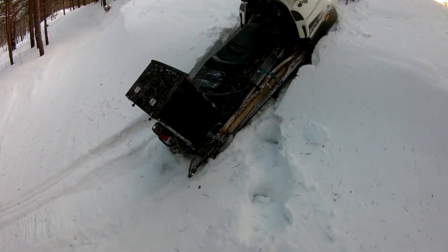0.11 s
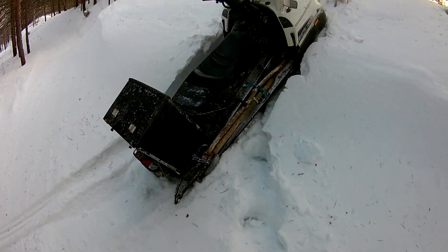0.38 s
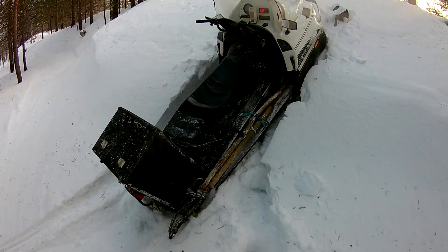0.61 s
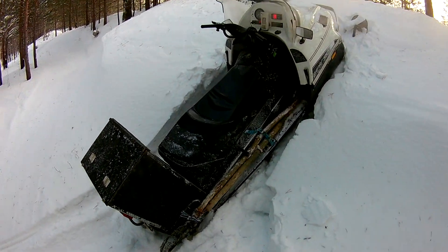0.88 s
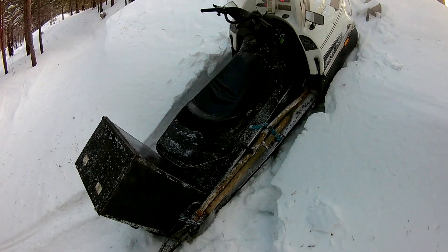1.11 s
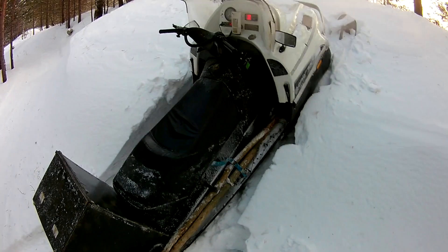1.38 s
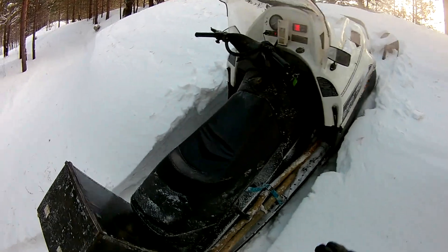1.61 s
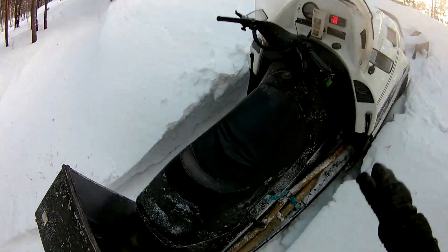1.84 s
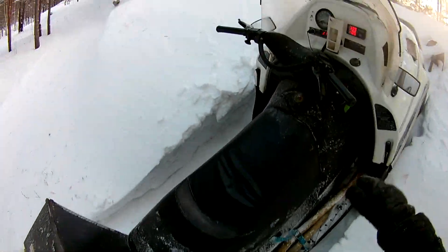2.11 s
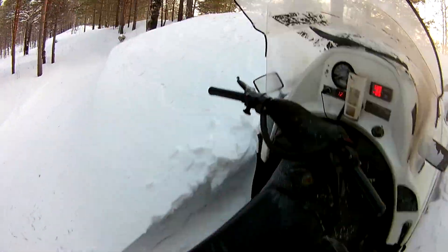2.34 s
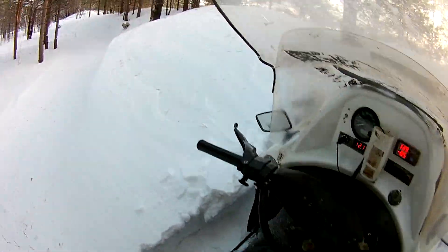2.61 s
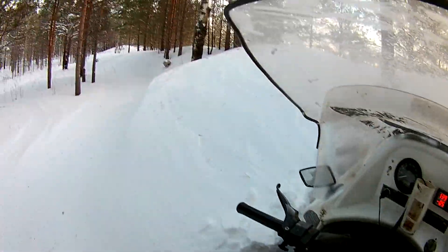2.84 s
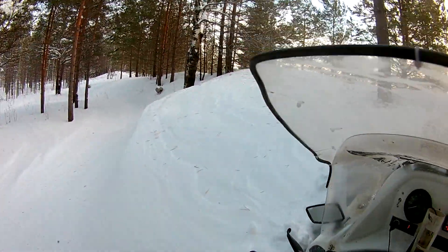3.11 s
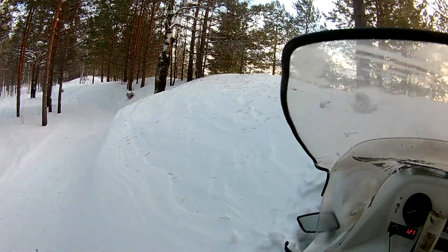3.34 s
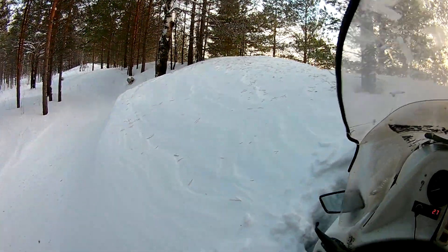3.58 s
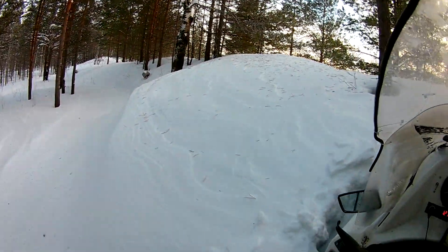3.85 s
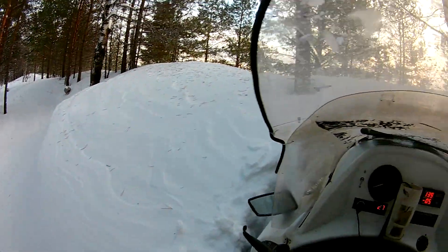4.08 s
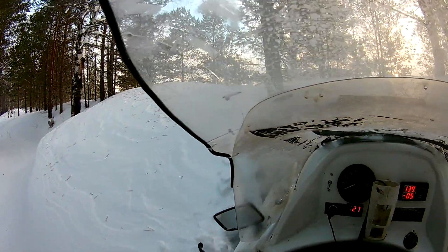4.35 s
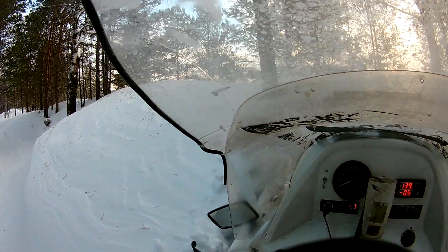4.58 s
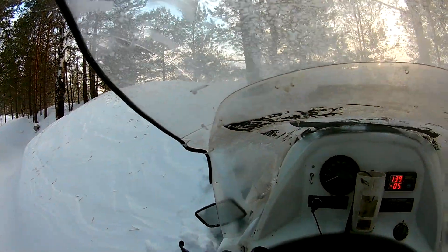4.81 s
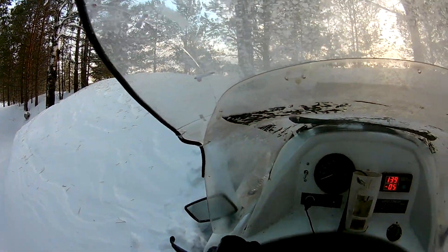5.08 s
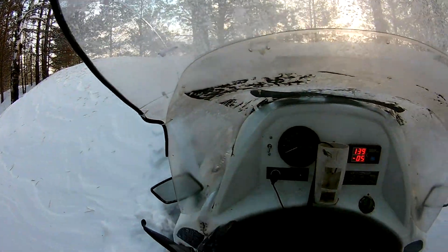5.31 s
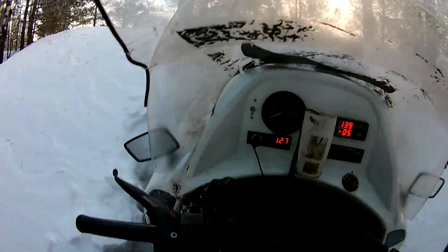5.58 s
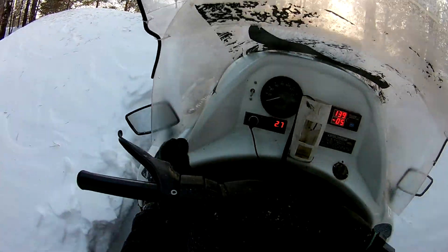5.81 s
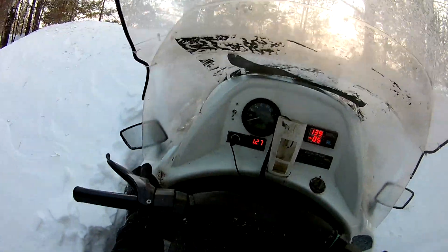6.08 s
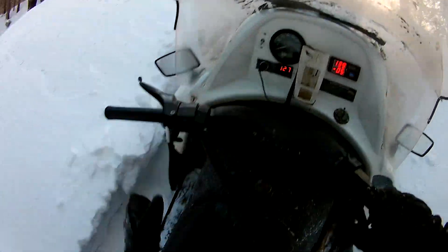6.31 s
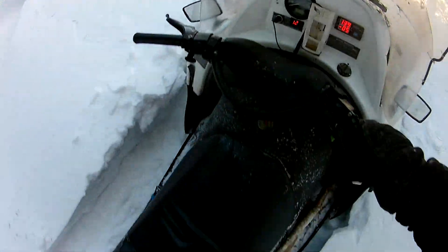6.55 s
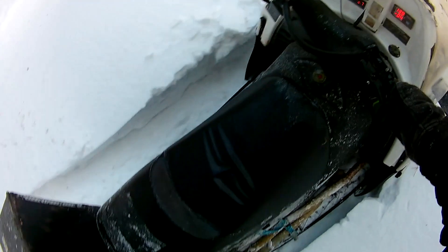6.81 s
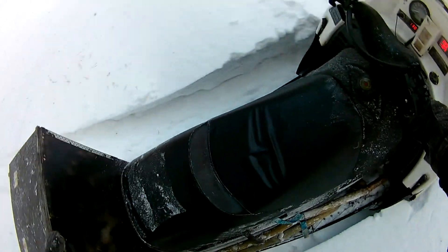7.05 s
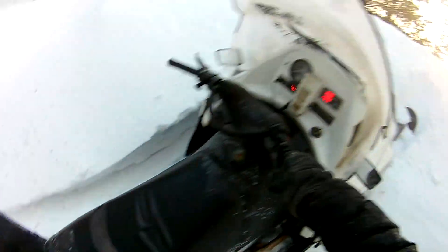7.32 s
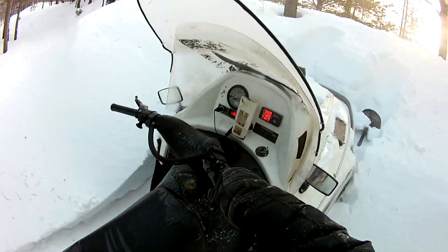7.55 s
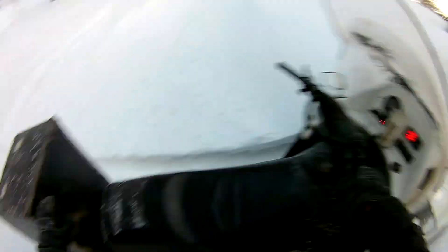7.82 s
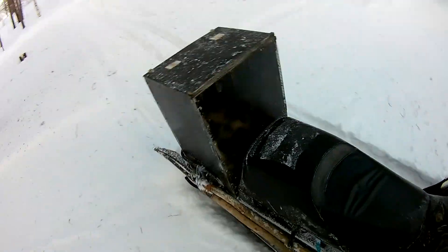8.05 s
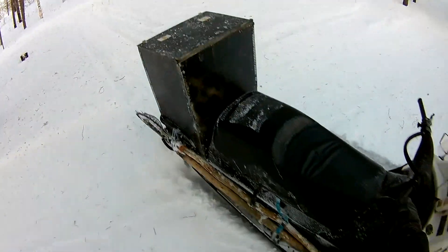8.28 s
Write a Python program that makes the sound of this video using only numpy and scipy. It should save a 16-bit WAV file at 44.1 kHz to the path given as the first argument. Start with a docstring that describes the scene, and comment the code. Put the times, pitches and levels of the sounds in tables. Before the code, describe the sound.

A single-cylinder four-stroke snowmobile idles in deep snow, outdoors and echo-free, heard from a microphone on the approaching rider. From 0 to 3.6 s its soft low putting, about ten and a half beats a second and slightly hunting, steadily grows nearer, gaining valve clatter and cowl rattle; a faint snowy crunch passes around 1 s, and a panel rings briefly at 2.5-3.2 s. Aboard, a lever double-clicks at 3.65 s, with dull clunks at 4.7, 5.2, 5.5 and 5.95 s. From 4.9 to 6.0 s a rough, wavering electric whine rises slightly and stops. At 6.3-6.5 s quick metallic clunks and hissy spits accompany a stumble; another clunk falls at 6.74 s. The engine surges to roughly twice idle speed by 7.1 s, pounding in a hard, blurred fast beat until 8.1 s. Loose steel ticks near 7.9-8.2 s, then the throttle shuts and the exhaust becomes duller, quieter and slower until the end at 8.4 s.

```python
"""In deep snow a single-cylinder four-stroke snowmobile idles; the listener walks up and climbs aboard.
Damped rings make the exhaust and the block; shaped noise timed by the crank makes the rattling parts.
A lever clicks and gears clunk as scrapes of noise, and a small electric motor whines as a wavering tone.
Then the throttle opens, the clutch bites, and the engine holds a fast beat and falls back."""
import sys
import numpy as np
from scipy import signal
from scipy.fft import rfft, irfft, next_fast_len
from scipy.io import wavfile
from scipy.ndimage import map_coordinates

SR = 44100
rng = np.random.default_rng(int(sys.argv[2]) if len(sys.argv) > 2 else 0)


def voltage_ratio(level):
    """Linear amplitude factor for a level in decibels (scalar or array-like)."""
    return 10 ** (np.asarray(level, float) / 20)


def generate_wav(sig):
    """Save sig (samples, or channels by samples) to the path in sys.argv[1] as 16-bit PCM at SR."""
    pcm = np.round(np.clip(np.atleast_2d(sig).T, -1, 1) * 32767).astype(np.int16)
    wavfile.write(sys.argv[1], SR, pcm)


N = 371322  # samples, 8.42 s

# Engine speed; the idle hunts, the pick-up stumbles: (time [s], four-stroke cycles per second [Hz])
CYCLE_RATE = [(0, 10.467), (.5, 10.658), (1.5, 10.502), (1.9, 10.833), (2.1, 10.555), (2.6, 10.536),
              (3, 10.793), (3.6, 10.715), (4.1, 10.059), (4.9, 10.129), (5.4, 10.949), (5.9, 11.315),
              (6.23, 10.853), (6.32, 9.817), (6.35, 12.723), (6.5, 14.076), (6.53, 18.533), (6.68, 13.489),
              (6.8, 18.947), (7.13, 22.914), (7.22, 21.616), (8.09, 22.495), (8.24, 19.556), (8.42, 18.598)]
# Exhaust character: (time [s], driven [0 = idle putt, 1 = driven thump], firing [0-1])
CHARACTER = [(0, 0.27, 1), (6.299, 0.21, 1), (6.449, 0.8, 0.8), (6.75, 0.4, 0.7), (6.95, 0.84, 0.89),
             (8.11, 0.92, 1), (8.135, 0.89, .08), (8.42, 1, 0.06)]
# The listener walks up: (time [s], nearness [dB, 0 = aboard], level of the tunnel's hum [dB])
NEARNESS = [(0, -12, -48), (.8, -9, -44.5), (1.7, -6, -44.5), (2.4, -3.5, -51.5), (2.8, -2, -50),
            (3.6, 0, -51), (4.0, -1, -49.5), (4.4, 1, -47.5), (5.2, 1, -35), (5.6, 0.5, -40.5),
            (6.0, -0.5, -30), (6.2, -0.5, -46)]
# How hard the machine is shaken once the drive takes up: (time [s], strain over idle [dB])
DRIVE_STRAIN = [(6.28, 0), (6.39, 6.5), (6.46, 6), (6.54, 3), (6.66, 4.5), (6.78, 9), (6.91, 11), (7.05, 8),
                (7.2, 5.5), (7.45, 6), (7.9, 5.5), (8.12, 4.5), (8.2, 2), (8.42, 0)]


def unit(x):
    """Normalisation: x scaled to an rms of 1."""
    return x / np.sqrt(np.mean(x ** 2) + 1e-20)


def curves(rows):
    """Linear interpolation: one value per sample for each column after the time."""
    s, *columns = np.transpose(rows)
    return [np.interp(np.arange(N) / SR, s, column) for column in columns]


def wobble(rate):
    """Band-limited fluctuation: a smooth random curve through rate knots a second."""
    knots = rng.standard_normal(int(N * rate / SR) + 4)
    return map_coordinates(knots, [np.arange(N) * rate / SR])


def filtered(x, response):
    """Linear filtering: the spectrum of x times a complex response of frequency."""
    m = next_fast_len(len(x) + SR // 4)
    return irfft(rfft(x, m) * response(np.fft.rfftfreq(m, 1 / SR)), m)[:len(x)]


def resonant(x, modes):
    """Modal superposition: x through parallel resonances (centre [Hz], width [Hz], level [dB])."""
    def response(f):
        total = 0
        for k, (centre, width, db) in enumerate(modes):
            mode = 1j * f * width / (centre * centre - f * f + 1j * f * width)
            total = total + (-1) ** k * voltage_ratio(db) * mode  # successive modes alternate in sign
        return total
    return filtered(x, response)


def coloured(x, points):
    """Spectral shaping: x through a gain curve of (frequency [Hz], gain [dB])."""
    hz, db = np.transpose(points)
    return filtered(x, lambda f: voltage_ratio(np.interp(np.log(f + 1), np.log(hz), db)))


def muffled(x, hz):
    """Absorption by snow and bodywork: four low-pass poles at hz, eased by one zero at 700 Hz."""
    return filtered(x, lambda f: 1 / (1 + 1j * f / hz) ** 4 * (1 + 1j * f / 700))


def struck(times, sizes, hz, t60, rise):
    """Impulse response of a damped oscillator, started at each time [s] with its own size."""
    t = np.arange(SR // 5) / SR
    kicks = np.zeros(N + SR)
    at = np.clip(np.round(times * SR).astype(int), 0, N + 1)
    np.add.at(kicks, at, sizes * (times > 0))
    ring = np.sin(2 * np.pi * hz * t) * voltage_ratio(-60 * t / t60) * (1 - np.exp(-t / rise))
    return signal.fftconvolve(kicks[:N], ring)[:N]


def crank():
    """Phase as the integral of rate: four-stroke cycles done at each sample."""
    start_cycle = 0.58
    return start_cycle + np.cumsum(curves(CYCLE_RATE)[0]) / SR


def stroke_times(share):
    """Inverted crank phase: moments at a share of each cycle (negative if before the start)."""
    done = crank()
    targets = np.arange(int(done[-1]) + 1) + share
    return np.interp(targets, done, np.arange(N) / SR, left=-1, right=N / SR + 1)


def part_levels():
    """Radiated level [dB] of each part as a linear sum of nearness, strain and driven terms."""
    # Each part by name: (base level [dB], dB per dB of nearness, dB per dB of strain, fully driven adds [dB]);
    # the tunnel's base comes on top of its hum, and some treble parts take a further trim in moving_parts
    parts = dict(tunnel=(0.5, 0.5, 1.72, 11), cowl=(-32, 0.96, 0.97, 0.5), block=(-36, 0.99, 0.81, 2.5),
             valves=(-50.5, 0.87, 1.24, -2), chain=(-64.5, 1.25, 1.26, -0.5), air=(-79, 0.3, 1.4, 8),
             shudder=(-37.5, 0.64, 1.35, 5.5))
    near, hum_db = curves(NEARNESS)
    strain, driven = curves(DRIVE_STRAIN)[0], curves(CHARACTER)[0]
    levels = {}
    for name, (base, per_near, per_strain, per_driven) in parts.items():
        levels[name] = base + per_near * near + per_strain * strain + per_driven * driven
    levels["tunnel"] = levels["tunnel"] + hum_db
    return levels


def exhaust():
    """Pulsed excitation of resonators: strokes ring the muffler at idle and push hard waves when driven."""
    # Exhaust gain: (time [s], level [dB])
    exhaust_level = [(0, -23), (.8, -21), (1.3, -19), (2.0, -17), (2.3, -15.5), (4.0, -16), (5.2, -13.5),
                     (6.2, -12.5), (6.39, -11), (6.46, -5), (6.53, -13), (6.59, -8.5), (6.65, -14),
                     (6.72, -8), (6.84, -5.5), (6.9, -11.5), (6.96, -5.5), (7.2, -5), (7.7, -6.5),
                     (7.9, -6), (8.12, -11), (8.25, -17), (8.42, -16)]
    # Muffler chambers answering one stroke at idle:
    # (delay after the firing mark [ms], pitch [Hz], relative pressure, t60 [s], rise [s])
    putt = [(-10.2, 125, -.6, .025, .001), (-6.6, 110, 1, .045, .001), (-4.6, 116, .55, .12, .001),
            (-3.3, 243, 1.4, .12, .0015), (-2, 408, .24, .08, .003)]
    # When driven, three hard pressure waves per stroke, unevenly spaced: columns as for putt
    thump = [(-9, 130, -1.6, .025, .004), (-4.9, 155, 6, .022, .006), (4.3, 210, 7.2, .021, .006)]
    # Gulp of air: (share of the cycle, gain per unit of 2.5 - driven [dB], gain per unit of driven [dB])
    intake = (.34, -2, -17)
    # Airbox resonances: (pitch [Hz], level [dB], t60 [s])
    airbox = [(123.4, 5, 0.066), (259, -21.5, 0.012)]
    shade_until_s, shade_db = 2.3, -6.5  # the bodywork first hides the muffler's ring at 243 Hz

    gulp_share, idle_db, driven_db = intake
    fire, gulp = stroke_times(0), stroke_times(gulp_share)
    s, driven, firing = np.transpose(CHARACTER)
    driven, firing = np.interp(fire, s, driven), np.interp(fire, s, firing)
    scatter_db = rng.standard_normal((len(fire), len(putt + thump) + 1))

    out = np.zeros(N)
    for k, (ms, hz, pressure, t60, rise) in enumerate(putt + thump):
        if k < len(putt):
            weight = 1 - driven
        else:
            weight = driven * (firing if ms < 0 else 1)  # a shut throttle leaves mainly the late wave
        if hz == 243:
            weight = weight * voltage_ratio(shade_db * (fire < shade_until_s))
        out += struck(fire + ms / 1000, weight * pressure * voltage_ratio(scatter_db[:, k]), hz, t60, rise)
    # unfired gas leaves as a dull push
    out += struck(fire + 0.00082, 2.1 * driven * (1 - firing), 65, 0.07, 0.0026)
    breath = voltage_ratio(idle_db * (2.5 - driven) + driven_db * driven + 0.65 * scatter_db[:, -1])
    for hz, db, t60 in airbox:
        out += struck(gulp - 0.0035, breath * voltage_ratio(db), hz, t60, rise=0.0012)
    return muffled(voltage_ratio(curves(exhaust_level)[0]) * out, hz=2900)


def rattle_noise(cycles, repeat, count):
    """Cyclostationary noise: a share of its power repeats, as the same parts meet in the same order."""
    drift_s = 1.474  # time in which the repeated pattern changes into another
    since = np.round((cycles % 1) / curves(CYCLE_RATE)[0] * SR).astype(int)
    age = np.arange(N) / SR / drift_s
    k, turn = age.astype(int), age % 1 * np.pi / 2  # equal-power crossfade between patterns
    habits = rng.standard_normal((count, k[-1] + 2, since.max() + 1))
    alike = np.cos(turn) * habits[:, k, since] + np.sin(turn) * habits[:, k + 1, since]
    return np.sqrt(repeat) * alike + np.sqrt(1 - repeat) * rng.standard_normal((count, N))


def firing_blast(cycles, driven):
    """Amplitude modulation: when driven the treble bursts with each cycle, more so under strain."""
    lead_s, width_s = 0.004, 0.012
    speed = curves(CYCLE_RATE)[0]
    since_s = ((cycles + lead_s * speed) % 1) / speed
    height = voltage_ratio(-8 + 1.6 * curves(DRIVE_STRAIN)[0]) * driven
    return 1 + height * np.exp(-(since_s / width_s) ** 2)


def treble_spits():
    """Transient envelopes: the treble spits abruptly as the drive takes up, then decays as a half Gaussian."""
    # Spits: (time [s], amplitude [dB], decay to 1/e [ms])
    hisses = [(6.342, -56, 22.3), (6.415, -58.5, 32), (6.496, -71, 14)]
    envelope = np.zeros(N)
    for s, db, ms in hisses:
        late_ms = 1000 * (np.arange(N) / SR - s)
        envelope += voltage_ratio(db) * (late_ms > 0) * np.exp(-(late_ms / ms) ** 2)
    return envelope


def moving_parts():
    """Modulated noise through resonant bodies: parts rattle with the strokes, which blur together at speed."""
    # Noise over one cycle, its contrast later scaled down when driven:
    # (share of the cycle, cowl [dB], block [dB], valves [dB])
    strokes = [(0, -7.5, 2, -4), (0.06, 2, -0.5, -4), (.12, -1.5, -2, -6.5), (.2, -2, 0.5, -1),
               (.28, -5, 1, 2.5), (0.329, 3, 3.5, 3), (.38, -4, 0.5, 1), (.44, -1.5, 2, 2),
               (.58, -1.5, 0, -0.5), (0.661, -4, -1.5, 0.5), (.76, -10, -4.5, -3.5),
               (0.839, 0.5, 1.5, -0.5), (.93, 1, -0.5, -3), (1, -3, -0.5, -1.5)]
    # Tunnel resonances, passed twice: (centre [Hz], width [Hz], level [dB])
    tunnel_modes = [(292.5, 78, -2.5), (386.4, 76, 1), (468.4, 82, -2.5)]
    # Cowl resonances: (centre [Hz], width [Hz], level [dB])
    cowl_modes = [(519.5, 79, -1), (617, 62.5, 1.5), (734, 80, 1), (852, 66, 1.5), (967, 130, -6)]
    # Block resonances: (centre [Hz], width [Hz], level [dB])
    block_modes = [(1009, 120, -2.5), (1138, 120, 3.5), (1373, 260, -2), (1559, 86, 1.5), (1780, 160, -9.5),
                   (2103, 236, -12)]
    # Valve gear spectrum: (frequency [Hz], gain [dB])
    valve_spectrum = [(2100, -16), (2300, -4), (2500, -1), (2870, -3.5), (3100, -11), (3250, -6),
                      (3600, -2), (4040, -6.5), (4400, -8), (4800, -14.5), (5200, -38.5)]
    # Chain spectrum: (frequency [Hz], density [dB per Hz])
    chain_spectrum = [(4500, -32.5), (4900, 1), (5400, 3.5), (6170, -5), (6800, -10), (7300, -11),
                      (7800, -43)]
    # Airy treble spectrum: (frequency [Hz], density [dB per Hz])
    air_spectrum = [(7600, -29), (8300, -4.5), (8700, -1), (9700, -3), (10600, 2), (12200, 0.5),
                    (13500, -10), (15500, -19.5)]
    # Shudder of frame and track: (frequency [Hz], density [dB per Hz])
    shudder_spectrum = [(12, -44.5), (20, -14), (59, 0.5), (113, -1), (135, -0.5), (179, -2.5), (246, -1),
                        (330, -23.5), (430, -50.5), (730, -120)]

    cycles, level = crank(), part_levels()
    driven = curves(CHARACTER)[0]
    idle = 1 - driven
    share, *shapes = np.transpose(strokes)
    contrast = 0.5 + 1.13 * idle
    cowl, block, valves = (
        unit(voltage_ratio(contrast * np.interp(cycles % 1, share, db) + 1.3 * wobble(90))) for db in shapes)
    blast = firing_blast(cycles, driven)
    hiss = rattle_noise(cycles, repeat=0.61 * (0.3 + 0.81 * idle), count=7)
    hiss[2] *= voltage_ratio(1.6 * wobble(900))  # metal contacts come in grains

    out = voltage_ratio(level["tunnel"]) * unit(resonant(resonant(cowl * hiss[4], tunnel_modes), tunnel_modes))
    out += voltage_ratio(level["cowl"]) * unit(muffled(resonant(cowl * hiss[0], cowl_modes), hz=2480))
    out += voltage_ratio(level["block"]) * unit(muffled(resonant(block * hiss[1], block_modes), hz=3520))
    valve_gain = voltage_ratio(level["valves"] - 2.1 * driven) * blast ** 0.4
    out += valve_gain * unit(coloured(valves * hiss[2], valve_spectrum))
    chain_gain = voltage_ratio(level["chain"] - 1.5 * driven) * blast ** 0.4
    out += chain_gain * unit(coloured(valves * hiss[5], chain_spectrum))
    air_gain = voltage_ratio(level["air"] - 9) * blast + treble_spits()
    out += air_gain * unit(coloured(block ** 1.5 * hiss[6], air_spectrum))
    out += voltage_ratio(level["shudder"]) * unit(coloured(hiss[3], shudder_spectrum))
    return out


def block_rings():
    """Impact excitation of modes: valves seating and gas bursting out ring the block."""
    # Blows, whose level is later scaled down when driven: (share of the cycle, pitch [Hz],
    # level over block noise when aboard [dB], t60 [s], further dB per dB of nearness)
    seatings = [(0.825, 1565, 7, .07, -0.6), (.93, 860, 12, .035, 1.4), (.94, 1130, 20, 0.02, .7),
                (.94, 560, 9.5, 0.02, -1), (.305, 1170, 12.5, 0.03, -1), (0.31, 4420, -12.5, 0.025, -1.2),
                (0.28, 3640, -9.5, 0.015, .35), (0.46, 2100, 0, 0.017, -1.5), (0.55, 1100, 7.5, 0.018, 2.7)]
    block_db = part_levels()["block"]
    near = curves(NEARNESS)[0]
    idle = 1 - curves(CHARACTER)[0]
    out = np.zeros(N)
    for share, hz, db, t60, grows in seatings:
        at = stroke_times(share)
        scatter = rng.standard_normal((len(at), 2))
        late_s, blows = 0.0006 * scatter[:, 0], voltage_ratio(1.5 * scatter[:, 1])
        gain = voltage_ratio(block_db + db + grows * near) * (0.26 + 0.54 * idle)
        out += gain * struck(at + late_s, blows, hz, t60, rise=0.0019)
    return out


def piston_shake():
    """Harmonics of a periodic force: the piston shakes the frame at 2, 3 and 4 times the cycle rate."""
    # Orders 2, 3, 4: sine amplitude over the shudder's rms [dB]
    order_levels = [-9, -16.5, -7.5]
    cycles, shudder_db = crank(), part_levels()["shudder"]
    out = np.zeros(N)
    for order, db in enumerate(order_levels, 2):
        out += voltage_ratio(shudder_db + db) * np.sin(2 * np.pi * order * cycles)
    return out


def cowl_panels():
    """Free and forced vibration: one panel rings on each firing, its neighbour hums on at idle."""
    # Swell of the ringing panel: (time [s], gain [dB])
    panel_swell = [(2.3, -67), (2.55, -23.5), (3.1, -25.5), (3.3, -42), (3.5, -66)]
    ring = voltage_ratio(curves(panel_swell)[0]) * struck(stroke_times(0.0506), 0.71, 742, 0.2, rise=0.0091)
    idle = 1 - curves(CHARACTER)[0]
    hum = unit(resonant(rng.standard_normal(N), [(854.6, 15, 0)]))
    return muffled(ring + voltage_ratio(part_levels()["cowl"] - 8.5) * idle * hum, hz=2380)


def clunks():
    """Friction-excited modes: each contact is a short scrape of noise into the casing and the steel parts."""
    # Lever clicks and gear clunks: (time [s], steel peak [dB], body over steel before a 2.5 dB cut [dB],
    # loudest body ring [Hz], scrape decay to 1/e [ms])
    contacts = [(3.634, -30, 14, 1000, 15), (3.678, -35, 21, 760, 14), (4.695, -28, 16, 420, 18),
                (5.188, -31, 22, 532, 15), (5.524, -35, 21, 546, 16), (5.952, -34, 21, 590, 20),
                (6.2956, -42, 11, 620, 15), (6.340, -28.5, 15, 804, 22), (6.414, -32, 19, 454, 22),
                (6.4941, -33, 13, 721, 16), (6.7411, -30.5, 14, 720, 14)]
    # Casing resonances: (centre [Hz], width [Hz], level [dB])
    casing_modes = [(384, 136, 3), (458, 105, 3.5), (715, 31, -16.5), (830, 138, 2), (1120, 53, -2),
                    (1464, 520, -10)]
    # Steel resonances, passed twice: (centre [Hz], width [Hz], level [dB])
    steel_modes = [(2500, 350, -7), (3950, 670, 5), (5140, 2200, -5.5), (6900, 1000, -8.5),
                   (8700, 850, -14.5), (11000, 2500, -12)]
    t = np.arange(SR // 8) / SR
    bodies, steels = np.zeros(N + SR), np.zeros(N + SR)
    for s, db, body_db, hz, ms in contacts:
        envelope = (1 - np.exp(-t / 0.0018)) * np.exp(-(1000 * t / ms) ** 2)
        scrape = rng.standard_normal((2, len(t))) * envelope
        loudest = [(hz, 140, 4.5)]
        body = resonant(scrape[0], casing_modes) + resonant(resonant(scrape[1], loudest), loudest)
        steel = resonant(resonant(scrape[1], steel_modes), steel_modes)
        body_size = np.sort(abs(body))[-SR // 400]  # exceeded for about 2.5 ms in all
        start = round(s * SR)
        bodies[start:start + len(t)] += voltage_ratio(db + body_db - 2.5) * body / body_size
        steels[start:start + len(t)] += voltage_ratio(db) * steel / abs(steel).max()
    return muffled(bodies[:N], hz=2470) + steels[:N]


def loose_steel():
    """Periodic impacts: a loose steel part ticks twice a cycle and rings in two damped modes."""
    # Swell of the ticks before a random scatter: (time [s], level [dB])
    tick_swell = [(7.78, -60), (7.85, -38), (7.95, -24.5), (8.13, -24), (8.19, -28), (8.21, -70)]
    scatter_db = 3
    s = np.concatenate([stroke_times(share) for share in (0.43, 0.92)])
    db = np.interp(s, *np.transpose(tick_swell), left=-120, right=-120)
    db = db + scatter_db * rng.standard_normal(len(s))
    low = struck(s, voltage_ratio(db), 3600, 0.008, rise=0.0003)
    high = struck(s, voltage_ratio(db - 5), 4250, 0.008, rise=0.0004)
    return low + high


def gear_motor():
    """Frequency modulation: a rough, wavering whine climbs exponentially as the electric motor spins up."""
    on_s, off_s, edge_s, spin_up_s = 4.86, 6.005, 0.018, 0.6
    start_hz, top_hz = 362.6, 422.4
    start_db, top_db = -29, -18.5
    t = np.arange(N) / SR
    up = 1 - np.exp(-np.clip(t - on_s, 0, None) / spin_up_s)
    hz = start_hz + (top_hz - start_hz) * up
    waver = 1 + 0.01787 * wobble(14) + 0.0157 * wobble(35) + 0.0284 * wobble(150)
    phase = 2 * np.pi * np.cumsum(hz * waver) / SR
    gate = np.clip(np.minimum(t - on_s, off_s - t) / edge_s, 0, 1)
    db = start_db + (top_db - start_db) * up
    return gate * voltage_ratio(db + 2.2 * wobble(45)) * (np.sin(phase) + 0.066 * np.sin(2 * phase))


def boot_in_snow():
    """Granular friction: a boot sinks into snow as a flat-topped, grainy swell of resonant noise."""
    # The step: (centre time [s], level [dB], half length [s])
    step = (1.015, -49, 0.2)
    # Snow resonances: (centre [Hz], width [Hz], level [dB])
    snow_modes = [(1780, 140, 4.5), (3800, 1000, -18)]
    s, db, half_s = step
    swell = voltage_ratio(db + 1.9 * wobble(59.5)) * np.exp(-((np.arange(N) / SR - s) / half_s) ** 4)
    return swell * unit(muffled(resonant(rng.standard_normal(N), snow_modes), hz=4500))


def scene():
    """Superposition at one microphone; soft snow returns no echo."""
    engine = exhaust() + moving_parts() + block_rings() + piston_shake() + cowl_panels()
    gearing = clunks() + loose_steel() + gear_motor()
    return (engine + gearing + boot_in_snow())[None]


def roll_off(x):
    """The treble ends steeply here."""
    return signal.sosfilt(signal.butter(12, 15720, fs=SR, output="sos"), x)


def record(dry):
    """Filtering and saturation: a narrow gap near 8 kHz, a faint input hiss, the highest peaks rounded off."""
    # (frequency [Hz], gain [dB])
    recording_response = [(5, -30.5), (22, -6.5), (32, 2.5), (55, 0.5), (7300, -2.0), (7950, -10.5),
                          (8300, -2.5), (12500, -4.5), (13300, -15.5)]
    wet = coloured(dry[0], recording_response) + voltage_ratio(-78.5) * rng.standard_normal(N)
    wet = wet / (1 + abs(wet / 1.15) ** 8) ** (1 / 8)
    return roll_off(wet[None])


dry = scene()
out = record(dry)
generate_wav(out)
```